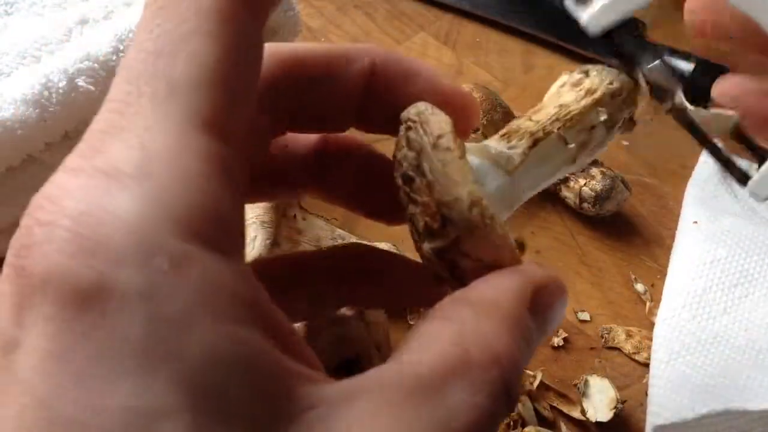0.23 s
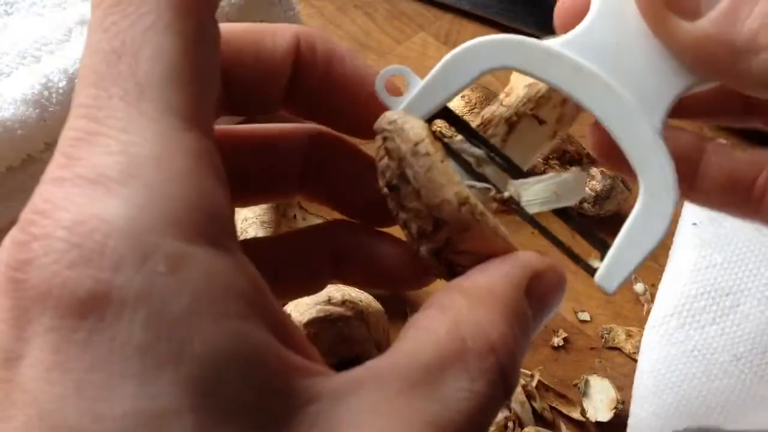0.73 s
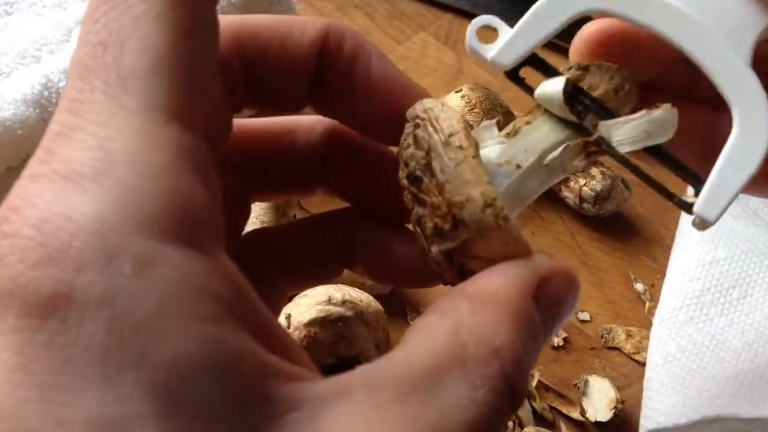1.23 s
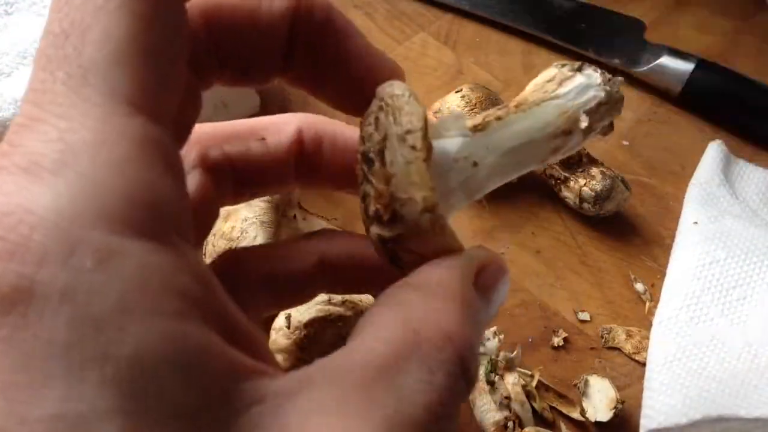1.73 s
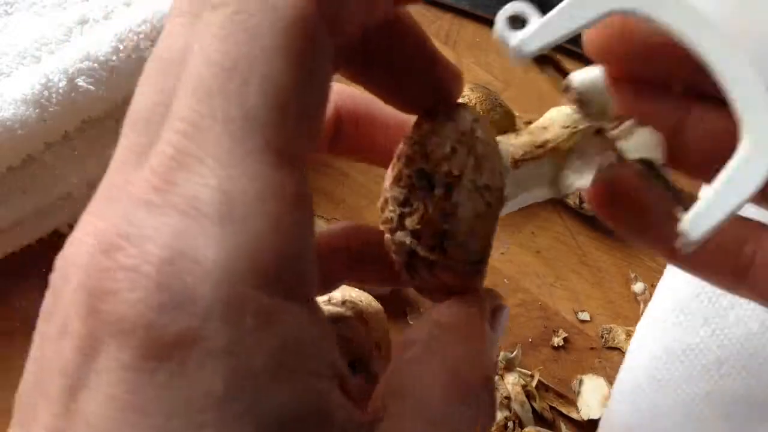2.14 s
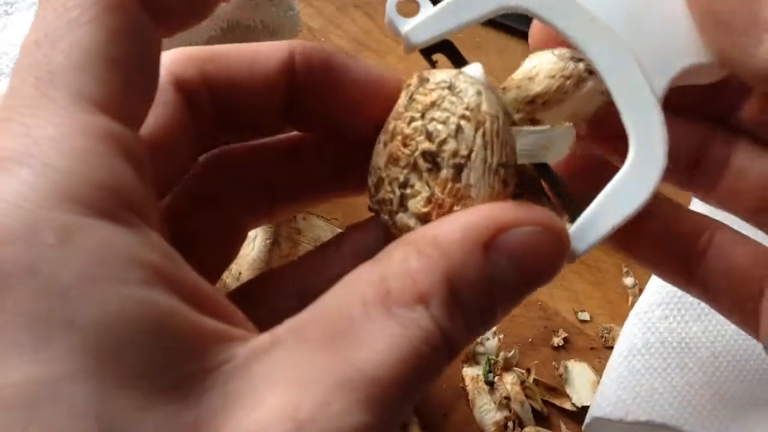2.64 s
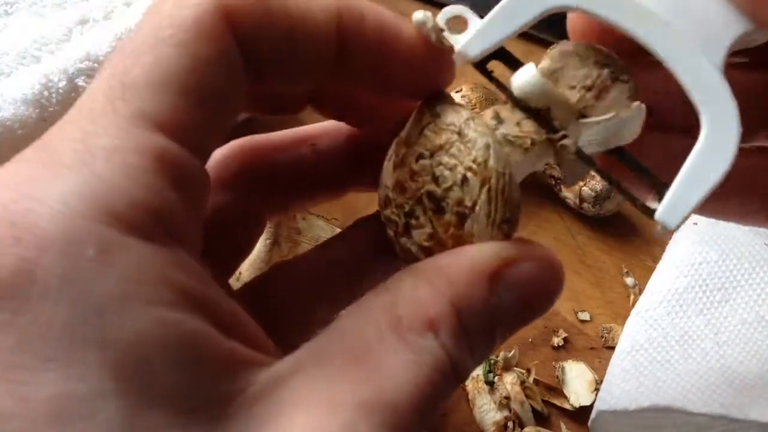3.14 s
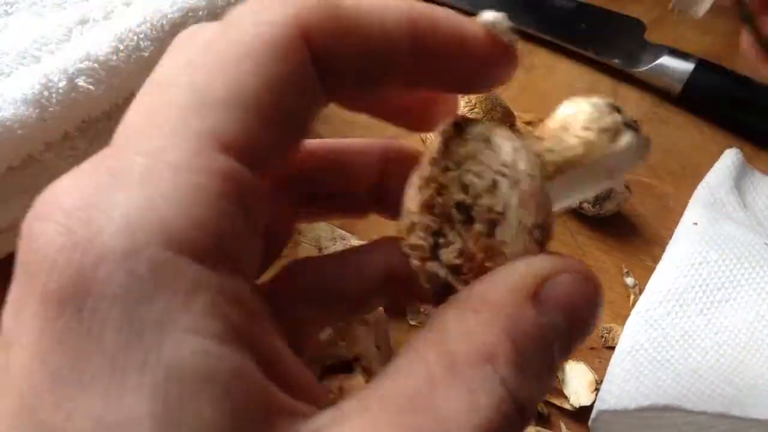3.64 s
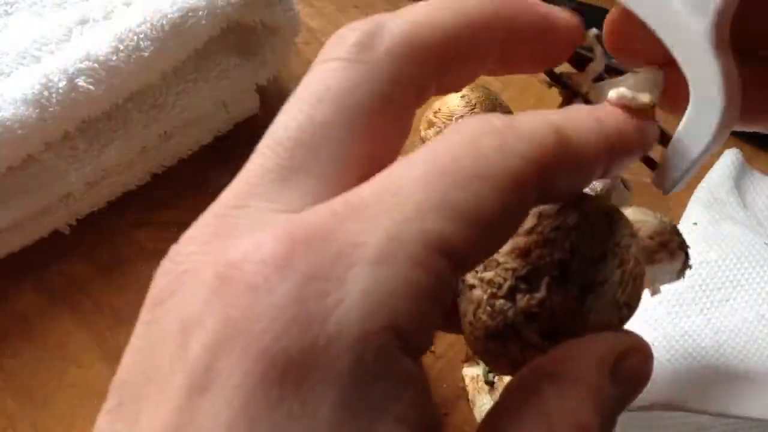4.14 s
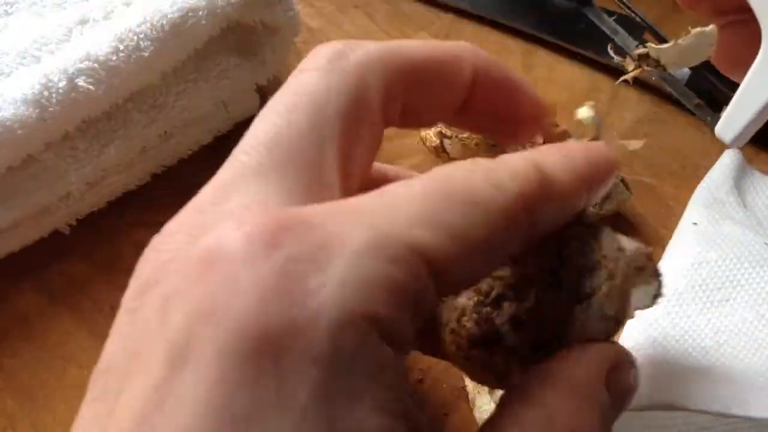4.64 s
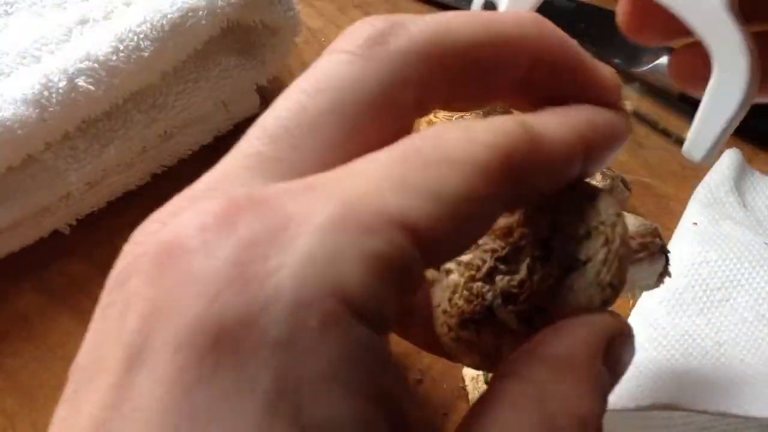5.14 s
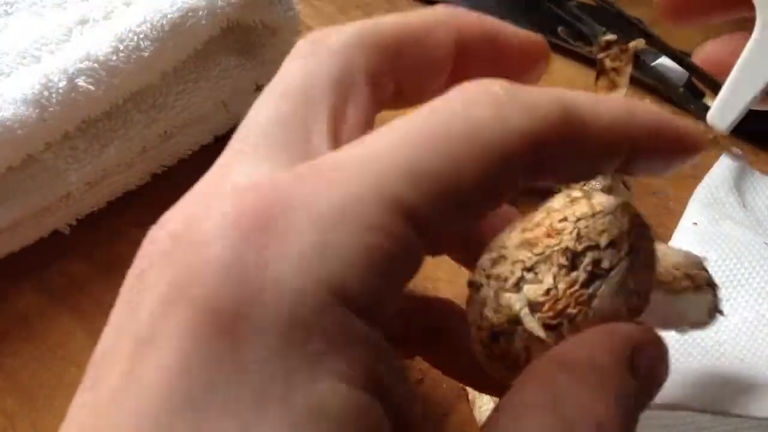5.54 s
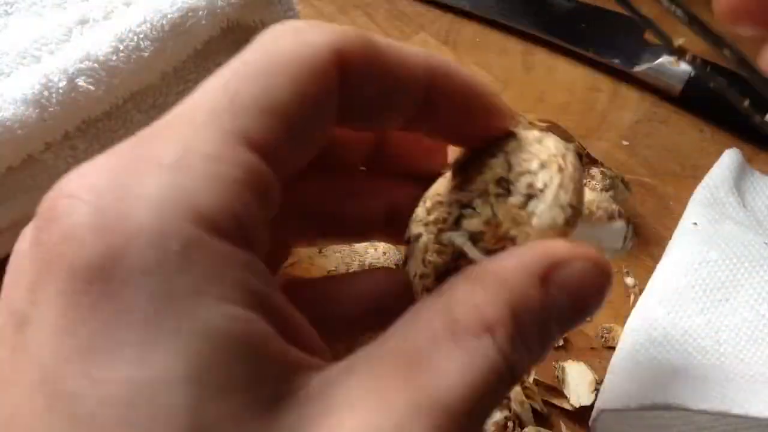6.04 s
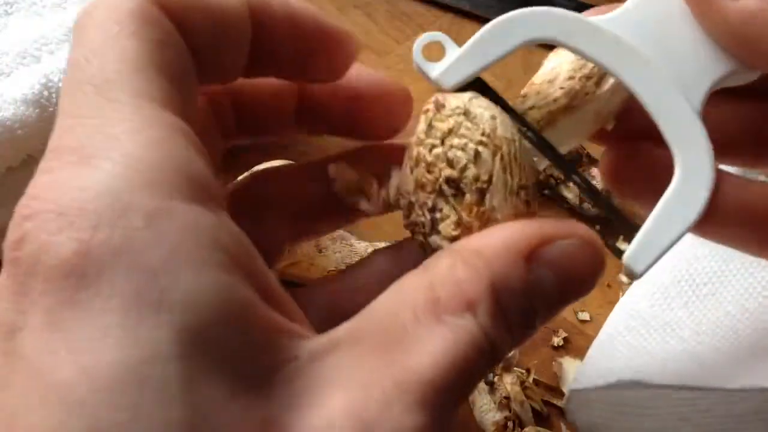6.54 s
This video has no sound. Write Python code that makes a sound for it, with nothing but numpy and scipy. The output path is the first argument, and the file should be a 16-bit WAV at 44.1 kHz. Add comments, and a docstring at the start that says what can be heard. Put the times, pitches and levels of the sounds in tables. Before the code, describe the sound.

The loose blade of a vegetable peeler ticks and rasps softly through mushroom skin in a quiet, faintly humming kitchen.

```python
"""In a quiet kitchen, a swivel peeler shaves the stem of a mushroom held over a wooden board.
The loose steel blade clacks and ticks in its plastic frame. Between the ticks its edge rasps
softly through the skin, snapping tiny fibres, and fingers crackle faintly on the dry cap.
In the background an appliance hums and its fan pushes air."""
import sys
import numpy as np
from scipy import signal
from scipy.fft import rfft, irfft
from scipy.io import wavfile

SR = 44100
rng = np.random.default_rng(int(sys.argv[2]) if len(sys.argv) > 2 else 0)


def dump_mix(stems):
    """Bounce the given channels to the path in sys.argv[1] as a 16-bit WAV at rate SR."""
    frames = np.atleast_2d(stems).T  # one column per channel
    limited = np.clip(frames, -1, 1)  # hard clip at full scale
    pcm = np.round(limited * 32767).astype(np.int16)
    wavfile.write(sys.argv[1], SR, pcm)


N = 299439
TIME = np.arange(N) / SR
TREBLE_EDGE_HZ = 8000   # where the blade's middle range ends and its treble begins

# Steady tones of the appliance's motor: pitch_hz, level_db
MOTOR_TONES = [(45.8, -87), (119.8, -71.5), (273.2, -71.5), (296.8, -101), (360.0, -70), (419.9, -75.5),
               (482.5, -84)]
# Slow rise and fall of the appliance's low drone: time_s, level_db
DRONE_LEVELS = [(0.0, -58), (0.11, -59.5), (0.99, -61), (1.1, -67), (1.52, -80), (1.68, -61), (1.86, -52.5),
                (2.1, -69.5), (2.25, -58.5), (3.82, -62), (5.3, -57.5), (5.85, -56), (6.11, -59.5),
                (6.22, -69), (6.28, -57), (6.66, -66.5), (6.74, -47), (6.79, -55)]
# Strength of the fan's rush from low to high: pitch_hz, level_db_per_hz
AIR_SPECTRUM = [(15, -115), (45, -90.5), (100, -88.5), (170, -83), (230, -85.5), (350, -81.5), (500, -92),
                (700, -94), (1200, -97), (1500, -97.5), (2300, -97.5), (3000, -101), (7000, -106.5),
                (15000, -108)]
# Resonances (pitches that ring) of the fan's duct: pitch_hz, width_before_narrowing_hz, gain_db
DUCT_RESONANCES = [(1473, 63, 13), (2110, 120, 3.5), (3046, 200, -11.5)]
# Single fibres of skin that snap: start_s, level_db, pitch_hz
FIBRE_SNAPS = [(1.5614, -57.5, 5500), (1.582, -57, 2200), (1.712, -64, 10500), (1.7505, -63, 7500),
               (1.9, -60, 3800), (1.9987, -61, 4630), (2.147, -62, 5460), (2.562, -60, 5500),
               (3.473, -56.5, 2800), (3.482, -58, 3000), (3.494, -57, 2900), (3.61, -57, 3800)]
# Strokes through the skin: middle_s, half_length_s, level_db, treble_gain_db, ring_pitch_hz
PEELING_STROKES = [(0.042, .0099, -48, -2, 3000), (1.015, .011, -62, -3, 4720),
                   (1.51, 0.02, -66.5, -1, 2100), (1.588, 0.036, -59.5, 0, 2050),
                   (1.862, 0.048, -64.5, -18, 3900), (2.02, 0.047, -76, -15, 2200),
                   (2.416, 0.0056, -57.5, -4, 4500), (2.625, 0.051, -62.5, -7, 4340),
                   (2.942, 0.0076, -61.5, -13, 4220), (3.053, 0.022, -57, -2.5, 4340),
                   (3.212, 0.013, -54, -11, 2500), (3.474, 0.016, -52.5, -6, 2810),
                   (3.582, 0.01, -49, -6, 3150), (4.194, .02, -63.5, -12, 3000),
                   (4.987, 0.012, -52.5, -7, 3860), (5.5, .015, -65.5, -3, 3000),
                   (5.99, 0.018, -60.5, -12, 3000), (6.365, 0.05, -60, -7, 5500),
                   (6.431, 0.016, -56, -15, 3300), (6.527, 0.026, -62.5, -4, 4050),
                   (6.674, 0.064, -65, -7, 3800)]
# Resonances of the blade while the flesh damps it: pitch_hz, width_hz, gain_db
DAMPED_BLADE_RESONANCES = [(1170, 490, -23), (2200, 410, 23), (3120, 5000, 24), (6100, 1200, -1.5)]
# Resonances of the free steel blade: pitch_hz, width_hz, gain_db
BLADE_RESONANCES = [(2680, 320, 6), (3470, 860, 4.5), (4010, 200, -4.5), (5080, 820, 3), (6330, 880, -5.5),
                    (7420, 500, -1), (9100, 516, -4), (10020, 1200, -1), (12200, 910, 5.5),
                    (13900, 700, -3)]
# Resonances of the plastic frame: pitch_hz, width_hz, gain_db
FRAME_RESONANCES = [(700, 290, -3), (1280, 290, 0), (2100, 300, 4)]
# Knocks of the loose blade: start_s, level_db, treble_gain_db, decay_s, ring_pitch_hz
BLADE_KNOCKS = [(0.0325, -55, -7, .0025, 2980), (0.2084, -54, -12, .0014, 5200),
                (0.2511, -23.5, -1, 0.0022, 6760), (0.3463, -35.5, -3, .0011, 7060),
                (0.3501, -47, -2, 0.0021, 5000), (0.3597, -48, -6, .004, 4900),
                (0.3995, -52.5, -16, 0.0028, 3500), (0.6859, -46, -5, 0.0016, 6100),
                (1.245, -64, 1, .001, 13500), (1.6047, -49, -6, .0045, 3000), (1.611, -56, -2, .001, 6000),
                (1.7228, -59, -6, 0.001, 3000), (1.9248, -56, -7, 0.0024, 3300),
                (1.945, -56.5, 2.5, 0.0015, 9230), (2.0328, -59, -6, .00085, 4000),
                (2.3054, -48.5, -10, 0.0029, 5400), (2.6624, -43.5, -17, 0.0019, 5500),
                (2.6695, -46, -6, 0.0014, 3900), (2.7856, -65, 4, 0.0011, 13000),
                (2.85, -62, 4, 0.0021, 7000), (3.2123, -56.5, -15, 0.0018, 2450),
                (3.56, -51, -6, .0059, 2980), (3.5803, -50, -14, 0.0019, 3700),
                (3.5885, -43.5, -1, 0.0022, 5170), (3.694, -54.5, -3, 0.0026, 3300),
                (3.7069, -61, 4, .0006, 11000), (3.741, -53, -6, 0.0016, 7600),
                (3.9339, -41.5, -14, 0.0018, 5200), (4.042, -33, 3.5, 0.0018, 10000),
                (4.9043, -57.5, -2, 0.0046, 4300), (4.9882, -53.5, -14, 0.003, 5160),
                (5.2248, -62.5, -17, 0.0017, 3680), (5.4134, -50.5, -15, .0007, 5300),
                (5.7465, -57, -7, 0.00087, 2900), (5.9771, -47.5, -6, 0.0039, 3220),
                (6.2354, -63, 6.5, 0.0016, 10000), (6.3418, -34, 5, .0019, 7400),
                (6.4278, -49.5, -15, 0.0022, 3260), (6.4454, -53, -17, 0.0024, 4700)]


def from_db(db):
    """Turn decibels into a number to multiply a sound by."""
    return 10 ** (np.asarray(db) / 20)


def rms_one(x):
    """Scale a sound so that its average strength (rms) is 1."""
    return x / np.sqrt(np.mean(x ** 2) + 1e-20)


def butter(x, hz, kind, order=4):
    """Keep the lows, the highs or a band of a sound."""
    return signal.sosfilt(signal.butter(order, hz, kind, fs=SR, output="sos"), x + 1e-18)


def drift(rate_hz):
    """A smooth random wobble of strength 1, mostly slower than rate_hz."""
    hz = np.fft.rfftfreq(N, 1 / SR)
    return rms_one(irfft(rfft(rng.standard_normal(N)) / (1 + (hz / rate_hz) ** 2), N))


def resonance(x, hz, width_hz):
    """Ring at one pitch; the narrower the width, the longer the ring."""
    r = np.exp(-np.pi * width_hz / SR)
    feedback = [1, -2 * r * np.cos(2 * np.pi * hz / SR), r * r]
    return signal.lfilter(np.array([1, 0, -1]) * (1 - r * r) / 2, feedback, x + 1e-18)


def ringing(force, resonances, direct_db):
    """A force is heard directly and through the resonances that it sets ringing."""
    rings = sum(from_db(db) * resonance(force, hz, width) for hz, width, db in resonances)
    return from_db(direct_db) * force + rings


def snaps(per_s, spread_db):
    """Clicks of uneven size at random moments."""
    sizes = from_db(spread_db * np.minimum(rng.exponential(1, N), 4)) * rng.choice([-1, 1], N)
    return sizes * (rng.random(N) < per_s / SR)


def add(out, start_s, sound):
    """Mix a short sound in at its moment."""
    at = int(start_s * SR)
    out[at:at + len(sound)] += sound[:N - at]


def drone_level(throb_hz=8.1):
    """The drone's level in dB: a slow swell with an uneven throb on it."""
    throb = np.abs(1 + drift(throb_hz) + 1j * drift(throb_hz))
    return np.interp(TIME, *np.transpose(DRONE_LEVELS)) + 20 * np.log10(rms_one(throb) + 1e-6)


def appliance(drone_db, drone_hz=141.7, waver_hz=4.175):
    """A motor hums with steady tones and a low drone that wavers in pitch and strength."""
    tones = sum(from_db(db) * np.sin(2 * np.pi * (hz * TIME + rng.random()) + 0.56 * drift(1))
                for hz, db in MOTOR_TONES)
    drone_phase = 2 * np.pi * np.cumsum(drone_hz + waver_hz * drift(7.32)) / SR
    return np.sqrt(2) * (tones + from_db(drone_db) * np.sin(drone_phase))


def fan_air(drone_db, follow_share=0.44, rumble_hz=190):
    """The fan's rush thins to a fine hiss at the top; its rumble rises and falls with the drone."""
    hz = np.fft.rfftfreq(N, 1 / SR) + 1
    table_hz, table_db = np.transpose(AIR_SPECTRUM)
    shape = from_db(np.interp(np.log(hz), np.log(table_hz), table_db))
    spectrum = rfft(rng.standard_normal(N)) * shape * np.sqrt(SR / 2)
    low_share = 1 / (1 + (hz / rumble_hz) ** 6)
    swell = from_db(follow_share * (drone_db - np.mean(drone_db)))
    return irfft(spectrum * (1 - low_share), N) + swell * irfft(spectrum * low_share, N)


def duct(level_db=-75.5, narrowing=0.22):
    """The rushing air rings faintly in the fan's duct."""
    rush = rng.standard_normal(N)
    rings = sum(from_db(db) * resonance(rush, hz, narrowing * width) for hz, width, db in DUCT_RESONANCES)
    return from_db(level_db) * rms_one(rings)


def kitchen_echo(x, fade_s=0.17, tail_db=-18, echo_s=0.0099, echo_db=-22):
    """Sound bounces once off the worktop, then dies away quickly in the room."""
    t = TIME[:SR // 3]
    tail = butter(rng.standard_normal(len(t)), 9000, "low", order=1)
    tail *= from_db(-60 * t / fade_s) * (1 - np.exp(-t / 0.0061))
    response = from_db(tail_db) * tail / np.sqrt(np.sum(tail ** 2))
    response[int(echo_s * SR)] += from_db(echo_db)
    return x + signal.fftconvolve(x, response)[:N]


def fingers(level_db=-74):
    """Fingers shift on the dry cap with a faint crackle that comes in clumps."""
    crackle = snaps(per_s=570, spread_db=-0.5) * from_db(5.8 * drift(10.4))
    return from_db(level_db) * rms_one(butter(crackle, [1800, 5500], "band", order=2))


def fibre_snaps(decay_s=0.00092, width_share=0.39):
    """Single fibres of skin break, each with a tiny dry crack."""
    out, t = np.zeros(N), TIME[:SR // 100]
    for start_s, db, hz in FIBRE_SNAPS:
        crack = butter(rng.standard_normal(len(t)) * np.exp(-t / decay_s), 1300, "high", order=2)
        add(out, start_s, from_db(db) * rms_one(resonance(crack, hz, width_share * hz)))
    return out


def pressure(middle_s, half_length_s, swell=2.6, release=6):
    """A stroke builds as the edge digs in and ends quickly as the strip comes free."""
    away = (TIME - middle_s) / half_length_s
    return 1 / (1 + .5 * np.abs(away) ** np.where(away < 0, swell, release))


def shaving(firm_stroke_db=-53):
    """The edge rasps through thousands of fibres a second; each stroke rings at its own pitch."""
    grip = from_db(2.3 * drift(220))   # the edge catches and slips, so fibres break in clumps
    cutting = grip * snaps(per_s=3300, spread_db=1.5)
    blade = ringing(cutting, DAMPED_BLADE_RESONANCES, direct_db=-49)
    rasp = rms_one(butter(blade, [600, TREBLE_EDGE_HZ], "band", order=3))
    hiss = rms_one(butter(cutting, TREBLE_EDGE_HZ, "high", order=2))
    out = np.zeros(N)
    for middle_s, half_length_s, db, treble_db, ring_hz in PEELING_STROKES:
        ring_db = 5 + .5 * (db - firm_stroke_db)   # pressed harder, the edge rings more
        ring = from_db(ring_db) * resonance(rasp, ring_hz, width_hz=450)
        stroke = rms_one(rasp + ring) + from_db(treble_db) * hiss
        out += from_db(db) * pressure(middle_s, half_length_s) * stroke
    return out


def light_touches(idle_per_s=.4, cutting_per_s=7, level_db=-58.5, spread_db=2.5):
    """The loose blade ticks faintly at random, more often as it cuts; gives rows like BLADE_KNOCKS."""
    treble_db, decay_s, ring_hz = -17, 0.0044, 3040
    cutting = sum(pressure(middle_s, half_length_s) for middle_s, half_length_s, *_ in PEELING_STROKES)
    starts = TIME[rng.random(N) < (idle_per_s + cutting_per_s * cutting) / SR]
    return [(s, level_db - spread_db * rng.standard_normal(), treble_db, decay_s, ring_hz) for s in starts]


def frame_knock(t, push_s=0.000098):
    """The landing blade gives the plastic frame one short push, heard as a low knock."""
    push = np.exp(-t / push_s)
    frame = sum((-1) ** k * from_db(db) * resonance(push, hz, width)
                for k, (hz, width, db) in enumerate(FRAME_RESONANCES))
    return rms_one(butter(frame, 500, "high", order=3))


def landing_force(t, decay_s, rise_s=0.0021, strike_s=0.00084, strike_width_s=0.00032):
    """The blade lands with one sharp strike and chatters for a few milliseconds."""
    noise = rng.standard_normal(len(t))
    touches = noise * np.abs(noise)   # a few hard touches among many light ones
    strike = from_db(-9) * np.exp(-((t - strike_s) / strike_width_s) ** 2)
    chatter = np.exp(-t / decay_s) * (1 - np.exp(-t / rise_s))
    return touches * (strike + chatter)


def blade_knock(level_db, treble_db, decay_s, ring_hz, usual_db=-46.5, usual_decay_s=0.0016):
    """One knock sets the steel blade and the plastic frame ringing together."""
    t = TIME[:int(.04 * SR)]
    strength_db = level_db - usual_db
    # a long, soft contact thuds; a short or strong one snaps with little bass
    bass_db = -12.5 - 0.1839 * strength_db + 4 * np.log2(decay_s / usual_decay_s)
    # the spot that is hit favours one pitch, less so for strong blows
    ring_db = 5 - 0.75 * max(strength_db, 0)
    blade = ringing(landing_force(t, decay_s), BLADE_RESONANCES, direct_db=2)
    blade += from_db(ring_db) * resonance(blade, ring_hz, 0.29 * ring_hz)
    bass = from_db(bass_db) * frame_knock(t)
    middle = rms_one(butter(blade, [2650, TREBLE_EDGE_HZ], "band"))
    treble = from_db(treble_db) * rms_one(butter(blade, TREBLE_EDGE_HZ, "high"))
    # halving gives these 40 ms the energy of 10 ms at full strength
    return .5 * from_db(level_db) * (bass + middle + treble)


def blade_ticks(knocks):
    """The loose blade knocks against its frame or the stem at each listed moment."""
    out = np.zeros(N)
    for start_s, level_db, treble_db, decay_s, ring_hz in knocks:
        add(out, start_s, blade_knock(level_db, treble_db, decay_s, ring_hz))
    return out


def scene():
    """The appliance in the background and the peeling close by, in one channel."""
    drone_db = drone_level()
    background = appliance(drone_db) + fan_air(drone_db) + duct()
    peeling = shaving() + fingers() + fibre_snaps()
    ticks = blade_ticks(BLADE_KNOCKS) + blade_ticks(light_touches())
    return (background + kitchen_echo(peeling + ticks))[None]


def record(dry, cutoff_hz=15300):
    """The very highest treble is cut off steeply."""
    return signal.sosfilt(signal.ellip(10, .2, 70, cutoff_hz, fs=SR, output="sos"), dry)


dry = scene()
out = record(dry)
dump_mix(out)
```